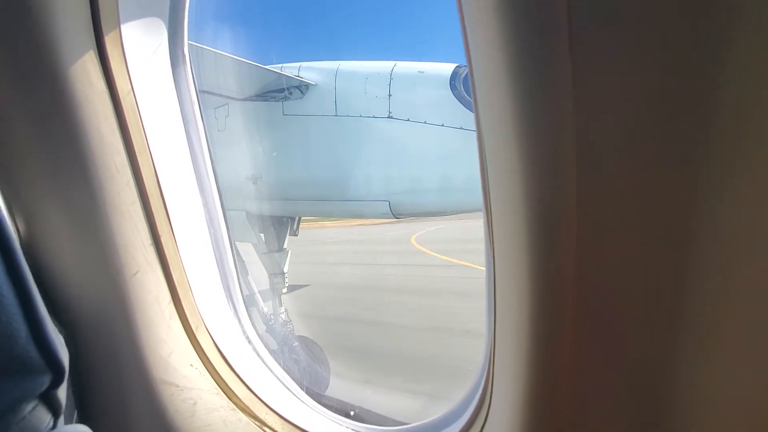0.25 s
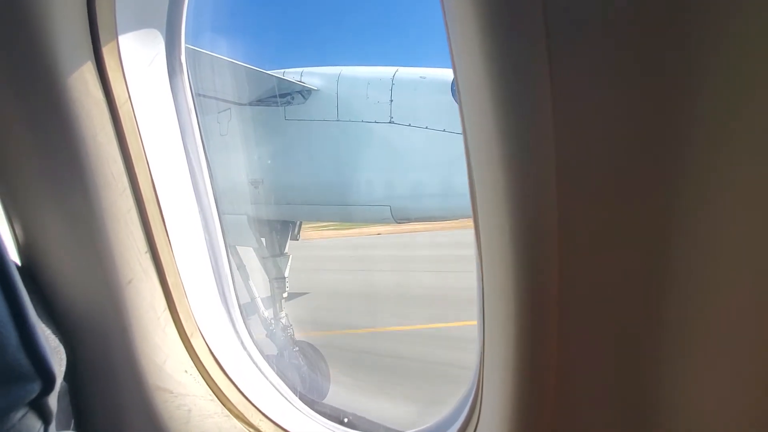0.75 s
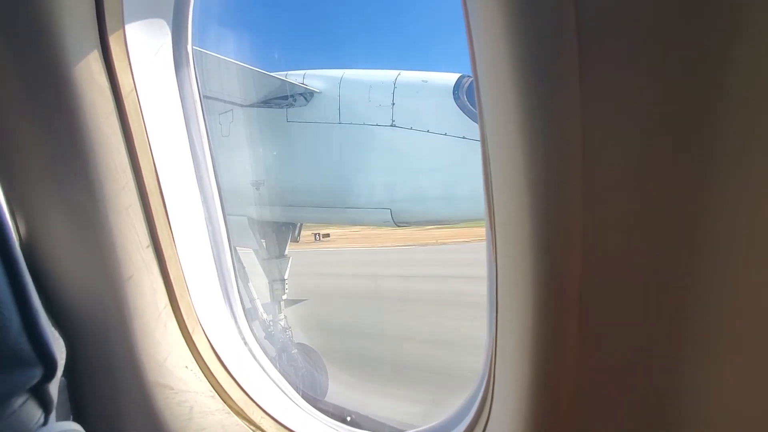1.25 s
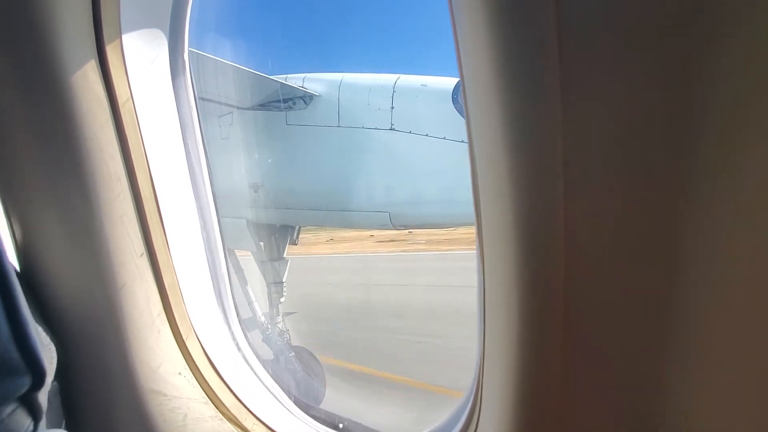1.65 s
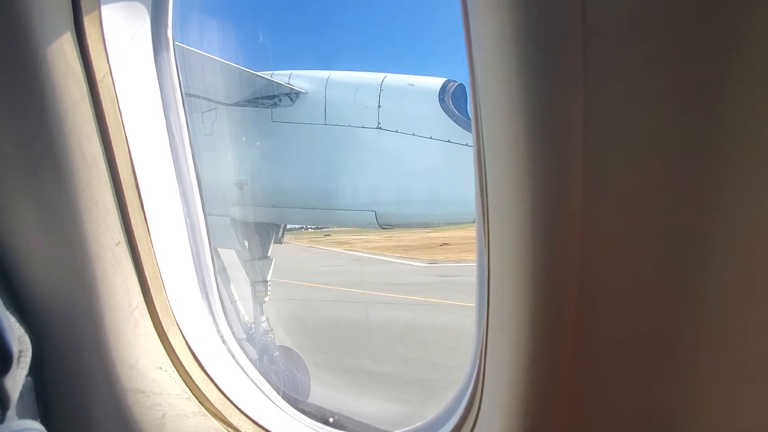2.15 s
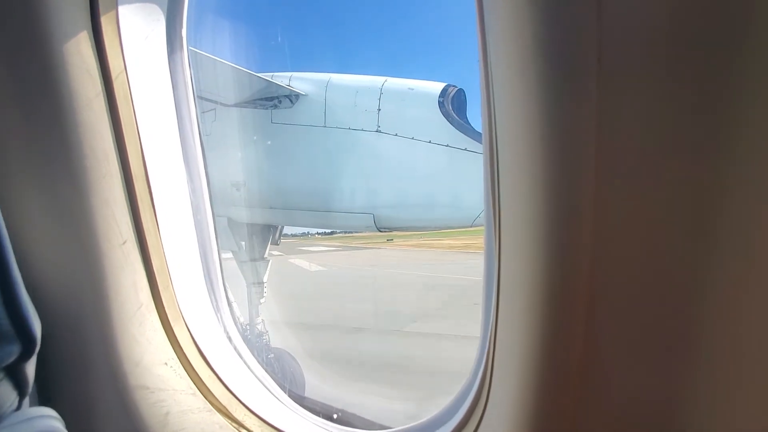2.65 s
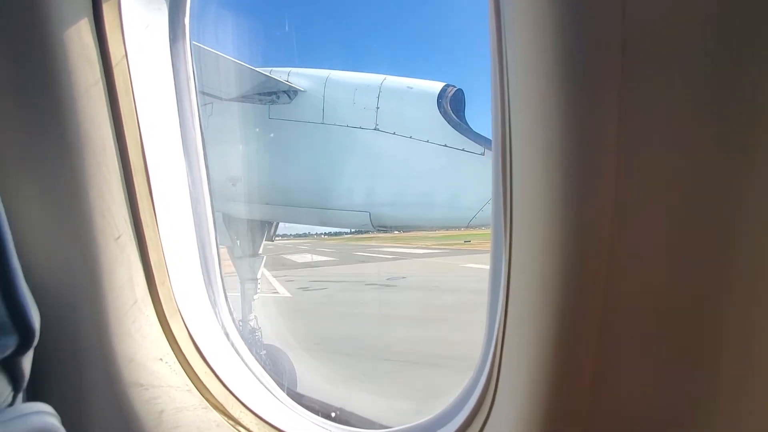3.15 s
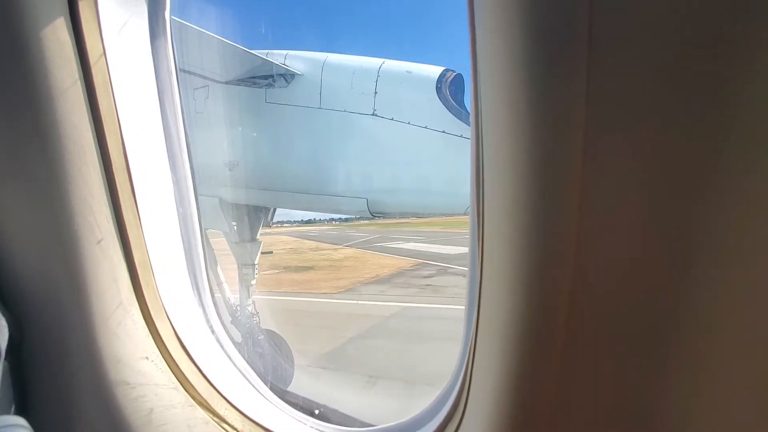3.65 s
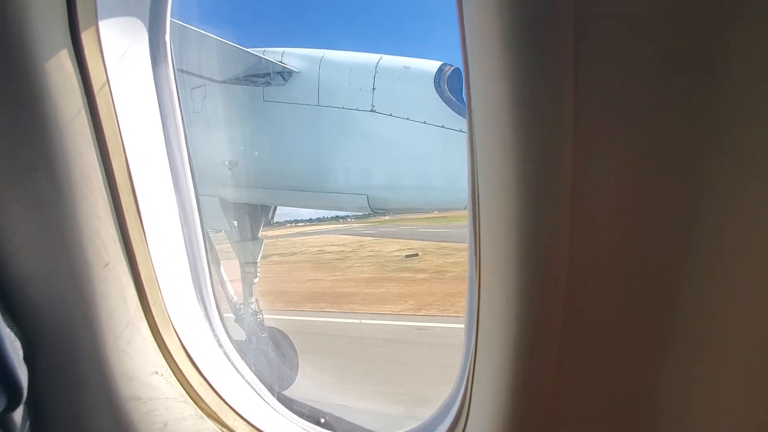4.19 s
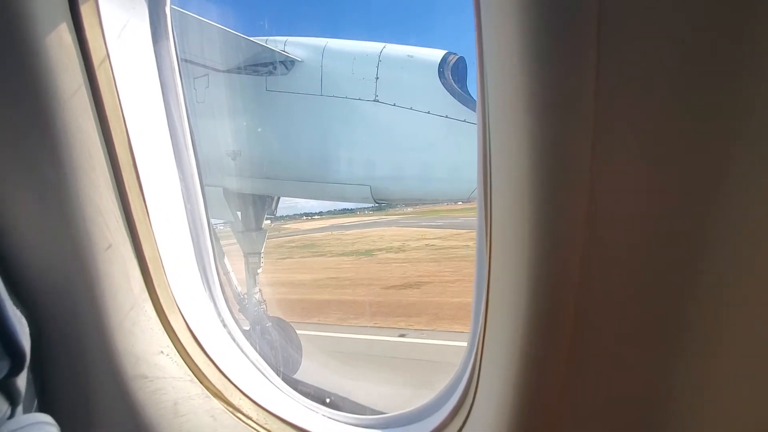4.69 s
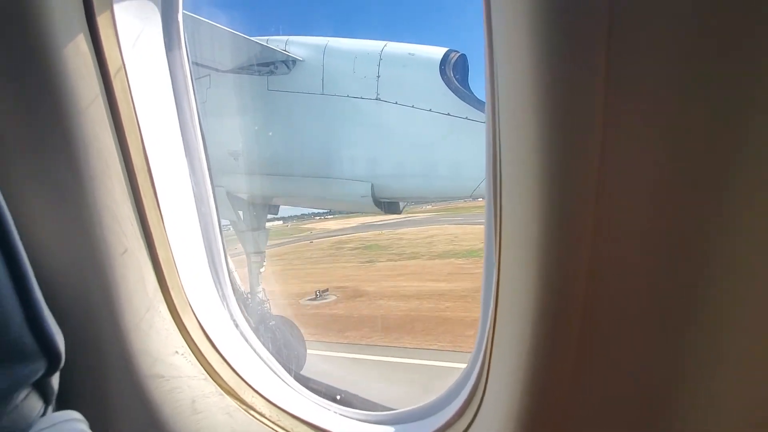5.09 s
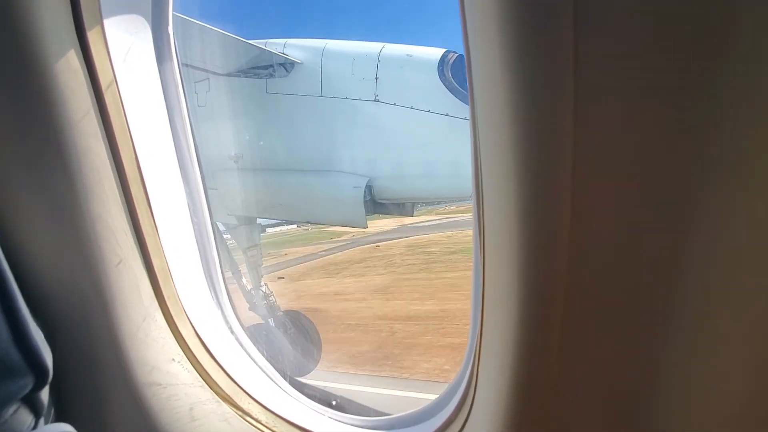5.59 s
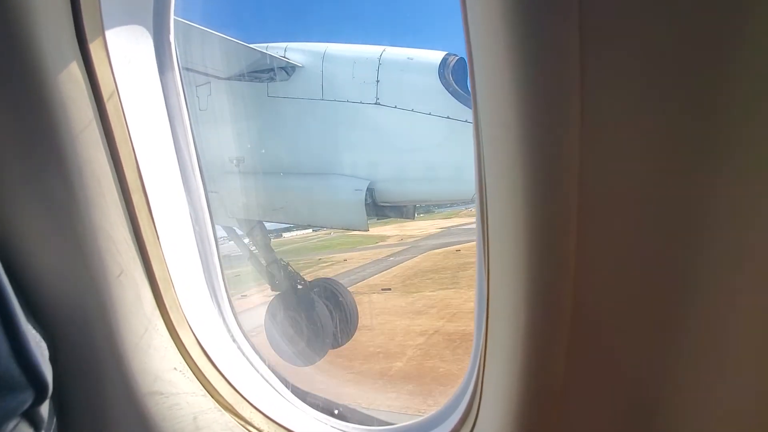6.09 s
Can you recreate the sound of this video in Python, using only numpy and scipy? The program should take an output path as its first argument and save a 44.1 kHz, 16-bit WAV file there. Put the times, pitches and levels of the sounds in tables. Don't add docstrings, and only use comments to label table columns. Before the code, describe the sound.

Inside a propeller plane's cabin on takeoff, a loud low drone throbs over rumble and rushing air, with a thud and small plastic rattles.

```python
import sys
import numpy as np
from scipy import signal
from scipy.fft import rfft, irfft, next_fast_len
from scipy.io import wavfile

SR = 44100
rng = np.random.default_rng(int(sys.argv[2]) if len(sys.argv) > 2 else 0)


def invert_db(x):
    u = np.asarray(x, float) / 20
    return 10 ** u


def log_audio(samples):
    frames = np.atleast_2d(samples).T
    limited = np.clip(frames, -1, 1)
    pcm = np.round(limited * 32767).astype(np.int16)
    wavfile.write(sys.argv[1], SR, pcm)


N = 279153


def rms_one(x):
    return x / np.sqrt(np.mean(x ** 2) + 1e-20)


def in_time(rows):
    s, *columns = np.transpose(rows)
    return [np.interp(np.arange(N) / SR, s, column) for column in columns]


def at_hz(points, hz):
    point_hz, value = np.transpose(points)
    return np.interp(np.log(hz), np.log(point_hz), value)


def drift(rate):
    hop = 40
    r = np.exp(-2 * np.pi * rate * hop / SR)
    noise = rng.standard_normal(N // hop + 2002)
    slow = signal.lfilter([1], [1, -2 * r, r * r], noise)[2000:]
    return np.interp(np.arange(N) / hop, np.arange(len(slow)), rms_one(slow))


def tone(hz, level_db):
    turns = np.cumsum(hz * np.ones(N)) / SR
    return np.sqrt(2) * invert_db(level_db) * np.sin(2 * np.pi * turns + rng.uniform(0, 2 * np.pi))


def coloured(pair, spectrum):
    # f/Hz, correlation
    likeness = [(25, 0.96), (45, 0.94), (60, 0.99), (130, 0.93), (290, 0.93), (450, 0.73), (640, 0.28),
                (1000, 0.11), (1410, -0.28), (3100, .05), (15000, -0.36)]
    # f/Hz, level/dB
    right_port = [(35, 0), (65, 1.8), (200, 1.35), (380, 2.5), (700, 0.5), (2400, 1.5), (3500, -0.5),
                  (4800, 4.5), (6000, -0.5), (7200, -8.5), (8300, -21), (9600, -13.5), (11000, -3),
                  (13000, -3.5), (15500, -6)]
    size = next_fast_len(N)
    hz = np.maximum(np.fft.rfftfreq(size, 1 / SR), 1)
    skirted = [(1, -90)] + spectrum + [(spectrum[-1][0] * 1.4, -70), (SR, -90)]
    mid, side = rfft(pair, size, axis=1) * invert_db(at_hz(skirted, hz))
    alike = np.clip(at_hz(likeness, hz), -1, 1)
    mid = mid * np.sqrt(1 + alike)
    side = side * np.sqrt(1 - alike)
    left = mid + side
    right = (mid - side) * invert_db(at_hz(right_port, hz))
    return irfft(np.array([left, right]), size, axis=1)[:, :N]


def propellers():
    # t/s, near propeller level/dB, far propeller level/dB, blade-tip bite/dB
    blade_levels = [(0, -19, -38.5, 10), (.21, -12, -37.5, 6.5), (.3, -26, -40, -0.5), (.6, -21.5, -36, -2),
                    (.9, -23, -33, -4.5), (1.15, -17.5, -33, -10.5), (1.45, -19.5, -27, -2.5),
                    (1.62, -13.5, -32.5, 6.5), (1.8, -9.5, -26.5, 6.5), (2.0, -7, -29.5, 1.5),
                    (2.36, -16, -33, -2), (2.95, -14, -21.5, -2.5), (3.4, -15, -21, -2.5),
                    (4.15, -16.5, -27, -1.5), (4.55, -14.5, -14.5, 4.5), (5.2, -13.5, -25.5, 3.5),
                    (5.7, -18.5, -28.5, 3.5), (6.33, -16, -20.5, -0.5)]
    # multiple of the blade tone, level at no bite/dB, growth/(dB/s)
    far_overtones = [(2, -32, 0.2), (3, -39.5, -0.95)]
    # multiple of the blade tone, level re third/dB
    upper_orders = [(4, -14.5), (5, -20), (6, -25)]
    blade_hz = 101.72
    sag_from_s, sag_hz_per_s = 1.0, .84
    beat_from_s, beat_hz_per_s, in_step_s = 1.757, 1.021, 3.024
    t = np.arange(N) / SR
    near_db, far_db, bite_db = in_time(blade_levels)

    near_hz = blade_hz + .15 - sag_hz_per_s * np.clip(t - sag_from_s, 0, None)
    near_turns = (np.cumsum(near_hz) - near_hz.sum()) / SR + 1 / 4
    beating = np.clip(t - beat_from_s, 0, None)
    lead_turns = beat_hz_per_s / 2 * (beating ** 2 - (in_step_s - beat_from_s) ** 2)
    near = invert_db(near_db) * np.sin(2 * np.pi * near_turns)
    far = invert_db(far_db) * np.sin(2 * np.pi * (near_turns + lead_turns))
    out = np.sqrt(2) * (near + far)

    out += tone(2 * near_hz, near_db - 27 + 1.5 * drift(3.1))
    for multiple, level_db, growth in far_overtones:
        order_db = level_db + bite_db + growth * (t - t.mean())
        out += tone(multiple * (blade_hz + .2 + .25 * drift(2.4)), order_db + 1.2 * drift(6.5))
    third_db = order_db
    for multiple, upper_db in upper_orders:
        out += tone(multiple * blade_hz + 1.5 * drift(3.3), third_db + upper_db + 2.1 * drift(7.3))
    return out * invert_db([[-.6], [.6]])


def gear_line():
    # f/Hz, level/dB
    whine = (1800, -74)
    hz, level_db = whine
    return tone(hz, level_db)


def thud():
    # t/s, start f/Hz, end f/Hz, peak level/dB, rise/s, hold/s
    floor_swing = (.222, 76.0, 68.0, -2.6, .03, .062)
    s, start_hz, end_hz, level_db, rise, hold = floor_swing
    age = np.arange(N) / SR - s
    ring_db = -50 * np.clip(age - rise, 0, None)
    cut_db = -900 * np.clip(age - rise - hold, 0, None)
    turns = np.cumsum(np.interp(age, [rise, rise + hold], [start_hz, end_hz])) / SR
    turns -= np.interp(rise, age, turns)
    return invert_db(level_db + ring_db + cut_db) * np.clip(age / rise, 0, 1) * np.cos(2 * np.pi * turns)


def ticks():
    # t/s, broad level/dB, knock level/dB, sizzle level/dB
    trim_ticks = [(0.7792, -55.5, -60.5, -65), (1.212, -53.5, -59, -57), (1.3006, -61.5, -64, -58),
                  (2.638, -59.5, -61, -56), (2.646, -47.5, -55.5, -48.5), (2.6922, -61.5, -55.5, -61),
                  (2.737, -61.5, -50.5, -60.5), (2.7587, -55.5, -50, -51), (2.7877, -60, -47.5, -57),
                  (2.814, -56.5, -62, -51.5), (2.85, -66, -61, -63), (2.904, -68, -53, -66),
                  (2.913, -68, -56, -69), (3.0897, -58.5, -57.5, -58.5), (4.093, -57.5, -54, -63.5),
                  (4.6318, -64.5, -64, -56), (4.8635, -46.5, -52, -42), (4.913, -62.5, -59, -57),
                  (4.9555, -57, -57.5, -45.5), (4.9997, -67, -50.5, -65.5), (5.1638, -59.5, -50, -57),
                  (5.292, -47.5, -62.5, -54), (5.9875, -54.5, -58, -61)]
    # t/s, broad level/dB, knock level/dB, sizzle level/dB, knock f/Hz
    joint_rattle = [
        (0.213, -35, -29.5, -43, 4450),
        (.2295, -45.5, -41.5, -46, 5400),
        (.238, -54, -49, -55, 5300),
        (.244, -46.5, -43.5, -49, 4200),
        (.269, -58.5, -53, -56, 4490),
        (.309, -65, -58.5, -56, 4560),
    ]
    # ratio to knock pitch, level/dB, t60/s
    clip_modes = [(1.0, 1.0, .024), (1.08, -3, .014), (2.561, -10, .013)]
    longest_t60, shorter_s_per_db = .11, .002
    tails, rings = np.zeros((3, N)), np.zeros(N)
    age = np.arange(SR // 4) / SR
    pitches = 4450 * (1 + 0.16 * rng.random(len(trim_ticks)))
    pitched_ticks = [(*row, hz) for row, hz in zip(trim_ticks, pitches)]
    for s, broad_db, knock_db, sizzle_db, hz in joint_rattle + pitched_ticks:
        at = slice(round(s * SR), round(s * SR) + len(age))
        t60 = np.clip(longest_t60 - shorter_s_per_db * (knock_db + 50.5), .02, longest_t60)
        fall_db = -60 * age / t60
        tails[0, at] += invert_db(broad_db + 1.8 * fall_db)
        tails[1, at] += invert_db(sizzle_db + fall_db)
        tails[2, at] += invert_db(knock_db + 1.9 * fall_db)
        for ratio, mode_db, mode_t60 in clip_modes:
            decay = invert_db(knock_db + mode_db - 60 * age / mode_t60)
            rings[at] += decay * np.sin(2 * np.pi * ratio * hz * age)

    grain = rng.standard_normal((3, 2, N)) * [[1], [.7]] * tails[:, None]
    broad = coloured(grain[0], [(2500, -14.5), (5500, -7), (7500, -3.5), (9500, -2.5), (12000, -5.5), (15800, -8)])
    sizzle = coloured(grain[1], [(9000, -20.5), (10500, -6.0), (11500, -0.5), (14000, -4.5), (15800, -8)])
    knock = coloured(grain[2], [(1000, -20.5), (3200, -6.5), (4400, 2), (5500, -3.5), (6500, -15.0)])
    tail = invert_db(1.0) * broad + invert_db(1.5) * sizzle + invert_db(-0.8) * knock
    return tail + rings * invert_db([[-6.5], [-1.5]])


def squeaks():
    # t/s, length/s, start f/Hz, end f/Hz, level/dB
    glides = [(.39, .08, 1380, 1450, -59), (.45, .08, 1450, 1372, -59), (.69, .12, 1805, 1800, -68),
              (.94, .07, 1252, 1252, -58), (3.382, .018, 6900, 6900, -71), (3.382, .03, 5300, 5300, -71),
              (3.382, .02, 3500, 3500, -72), (5.85, .6, 794, 750, -48.5), (5.8, .6, 615, 585, -45),
              (5.55, .25, 710, 845, -54), (4.35, 1.2, 68.5, 64.5, -23), (4.9, .55, 79, 77, -27),
              (5.15, .22, 132, 152, -28)]
    out = np.zeros(N + SR)
    for s, length, start_hz, end_hz, level_db in glides:
        share = np.linspace(0, 1, round(length * SR))
        turns = np.cumsum(start_hz + (end_hz - start_hz) * share) / SR
        swell = np.sqrt(2 * np.sin(np.pi * share).clip(0))
        out[round(s * SR):][:len(share)] += invert_db(level_db) * swell * np.sin(2 * np.pi * turns)
    return out[:N] * invert_db(2.5 * drift(12.0))


def buzzes():
    # t/s, length/s, f/Hz, level/dB
    chatters = [
        (1.845, .09, 9200, -69),
        (2.0, .06, 9200, -71),
        (2.915, .11, 9200, -72),
        (3.04, .08, 9300, -72),
        (3.17, .03, 9300, -72),
        (3.54, .04, 9200, -72),
        (3.62, .04, 9200, -73),
    ]
    t, out = np.arange(N) / SR, np.zeros(N)
    for s, length, hz, level_db in chatters:
        band = signal.butter(4, [hz - 900, hz + 900], "band", fs=SR, output="sos")
        fizz = rms_one(signal.sosfilt(band, rng.standard_normal(N)))
        gate = np.clip(np.minimum(t - s, s + length - t) / .018, 0, 1)
        out += fizz * invert_db(level_db) * gate
    return out * invert_db(3.5 * drift(50.0)) * invert_db([[1.2], [-12.0]])


def shared_swing():
    # t/s, level/dB
    shared_levels = [(0, -41.5), (.25, -43), (.29, -47.5), (.9, -47.5), (1.3, -48.5), (1.6, -44), (1.75, -42),
                     (1.94, -45), (2.07, -48.5), (2.5, -49.5), (3.1, -50), (3.67, -48), (4.2, -48),
                     (4.45, -45.5), (4.9, -45), (5.4, -45), (5.9, -44), (6.33, -44.5)]
    level_db, = in_time(shared_levels)
    return level_db - level_db.mean()


def turbulence(spectrum, level_db, patchy_db, rate):
    noise = coloured(rng.standard_normal((2, N)), spectrum)
    mid_rms = np.sqrt(np.mean(noise.mean(axis=0) ** 2))
    return noise / mid_rms * invert_db(level_db + patchy_db * drift(rate))


def air():
    # f/Hz, level per Hz/dB
    rumble_spectrum = [(20, -36), (30, -27), (40, -21), (52, -7.5), (66, -0.5), (80, -4), (95, -3.5),
                       (115, -20.5)]
    roar_spectrum = [(80, -6), (110, 4), (150, 2.5), (200, -2.5), (260, -2), (320, -6), (370, -13),
                     (420, -6), (480, -21.5), (600, -28.5)]
    rush_spectrum = [(380, -8), (500, -0.5), (600, -2.5), (680, -8.5), (950, -12), (1100, -16.5),
                     (1300, -15.5), (1600, -22), (2500, -24.5), (3400, -30), (4500, -40)]
    hiss_spectrum = [(2800, -4.5), (4000, -2.5), (5000, -4.5), (6000, -7.5), (7000, -10.5), (9000, -9.5),
                     (11000, -8), (13000, -13), (15500, -14.5)]
    # t/s, half width/s, swell/dB
    gear_jolts = [(.07, .06, 5), (.33, 0.046, 5), (.5, 0.043, 3), (.95, 0.054, 1), (1.25, 0.061, 8),
                  (1.78, .15, 3), (3.15, .2, 5.5), (4.6, 0.054, 3.5), (5.2, .3, 6), (5.85, 0.097, 4.5),
                  (6.3, .06, 6)]
    t, swing_db = np.arange(N) / SR, shared_swing()
    since_middle = t - t.mean()
    rumble_db = -26 + 0.69 * swing_db + .1 * since_middle
    roar_db = -24.5 + 0.93 * swing_db - 0.057 * since_middle
    rush_db = -41.5 + 1.01 * swing_db + .01 * since_middle
    hiss_db = -64 + .85 * swing_db - 0.24 * since_middle
    for s, width, jolt_db in gear_jolts:
        rumble_db += jolt_db * np.exp(-((t - s) / width) ** 2)
    out = turbulence(rumble_spectrum, rumble_db, patchy_db=0.35, rate=4.4)
    out += turbulence(roar_spectrum, roar_db, patchy_db=0.8, rate=5.2)
    out += turbulence(rush_spectrum, rush_db, patchy_db=0.6, rate=11.0)
    out += turbulence(hiss_spectrum, hiss_db, patchy_db=1.0, rate=13.0)
    return out


def scene():
    return propellers() + gear_line() + thud() + ticks() + squeaks() + buzzes() + air()


def roll_off(x):
    return signal.sosfilt(signal.butter(12, 15820, fs=SR, output="sos"), x)


def record(dry):
    rounded = 1.36 * np.tanh(dry / 1.26)
    return roll_off(rounded)


dry = scene()
out = record(dry)
log_audio(out)
```